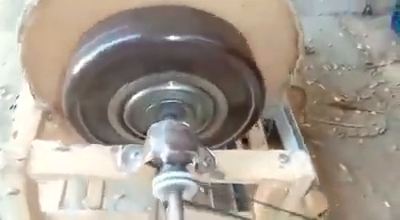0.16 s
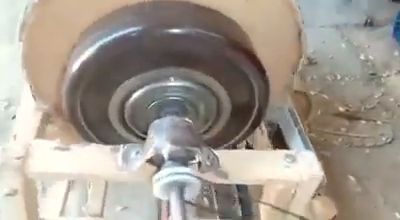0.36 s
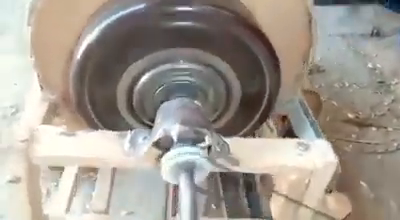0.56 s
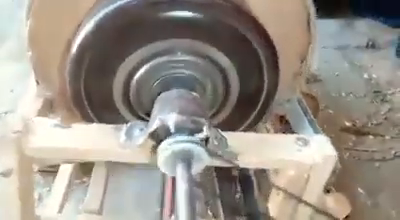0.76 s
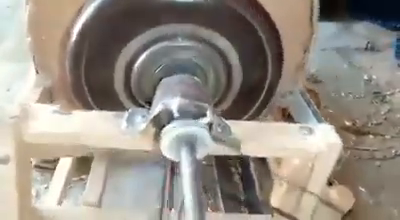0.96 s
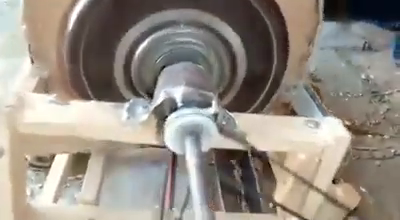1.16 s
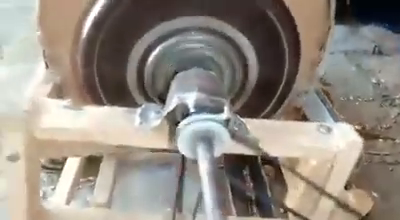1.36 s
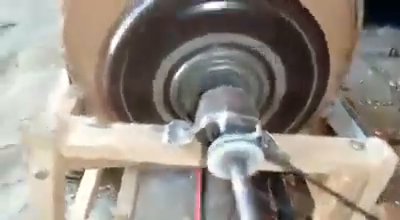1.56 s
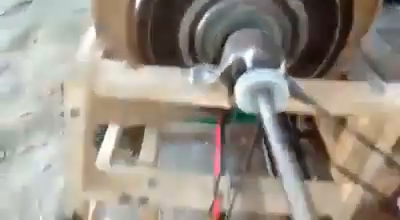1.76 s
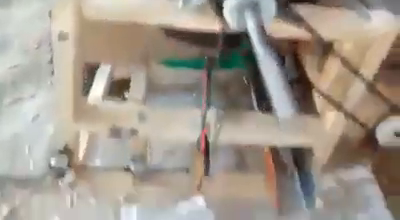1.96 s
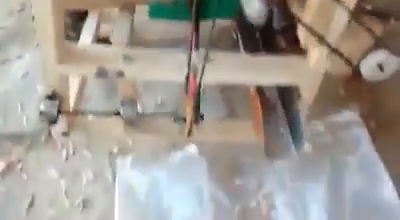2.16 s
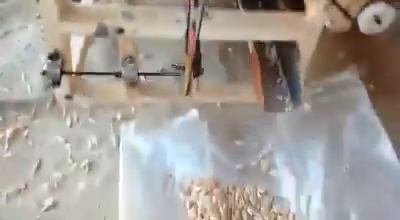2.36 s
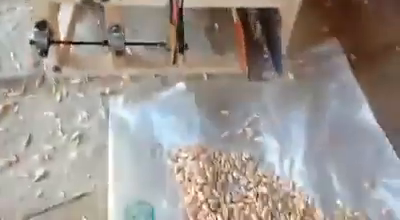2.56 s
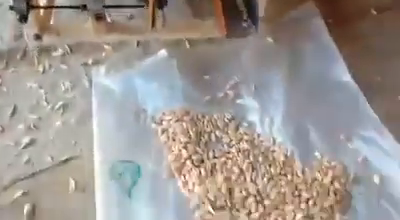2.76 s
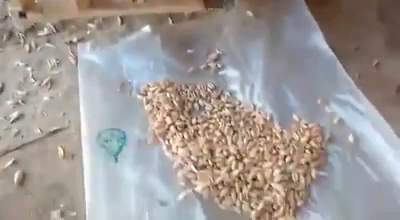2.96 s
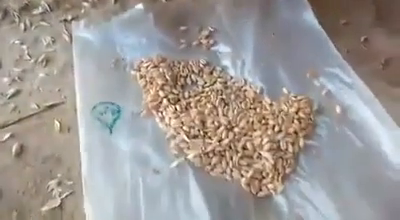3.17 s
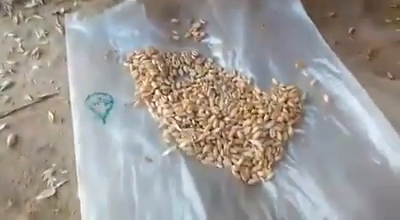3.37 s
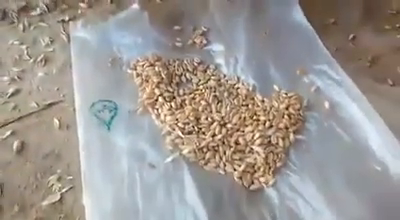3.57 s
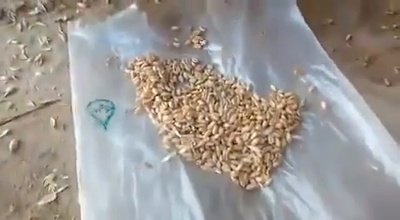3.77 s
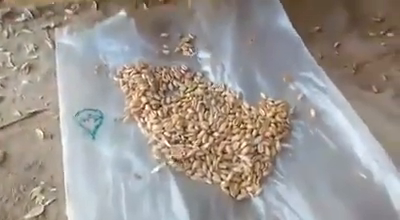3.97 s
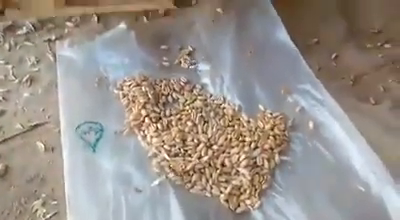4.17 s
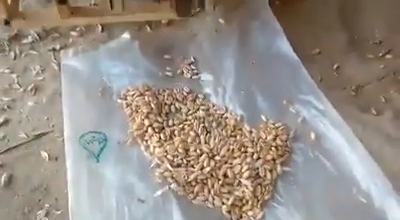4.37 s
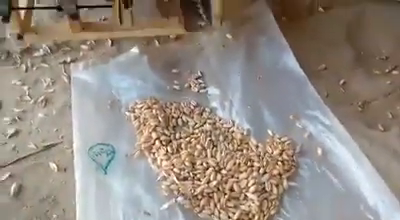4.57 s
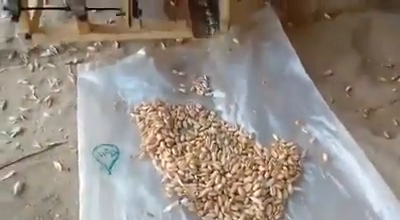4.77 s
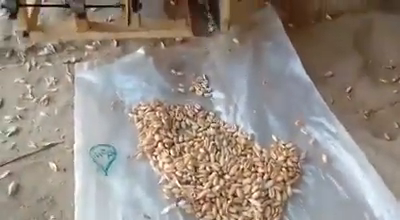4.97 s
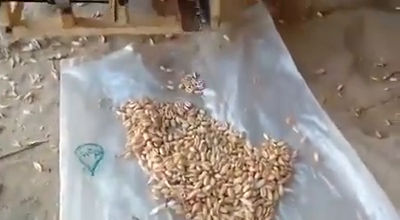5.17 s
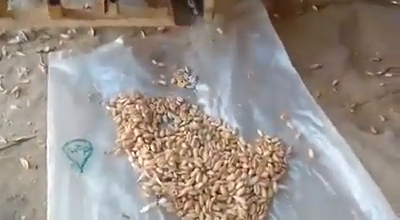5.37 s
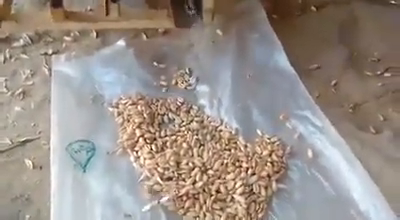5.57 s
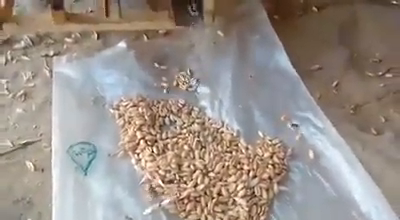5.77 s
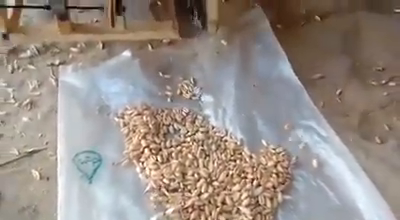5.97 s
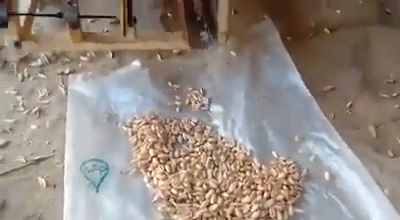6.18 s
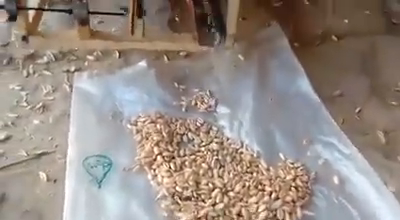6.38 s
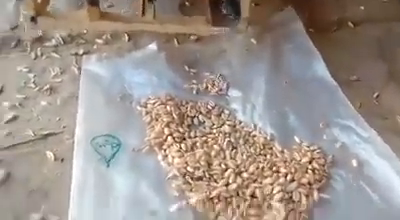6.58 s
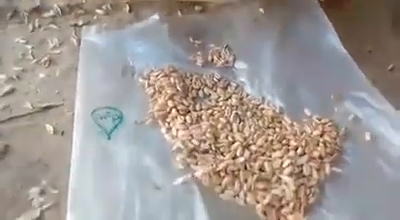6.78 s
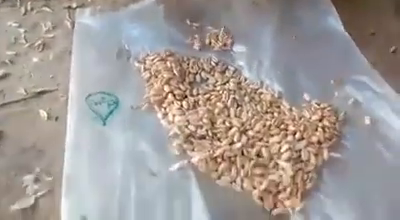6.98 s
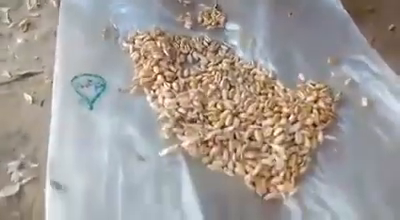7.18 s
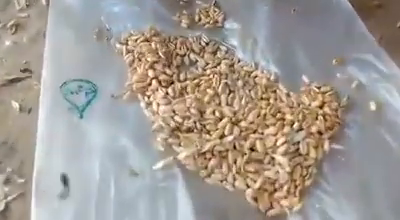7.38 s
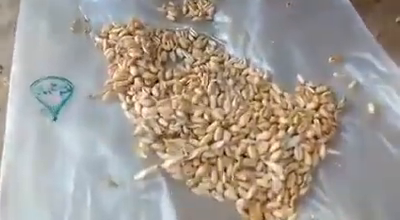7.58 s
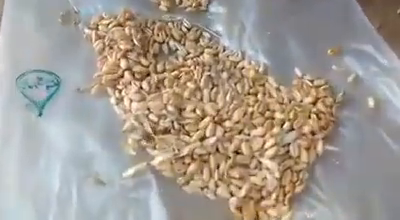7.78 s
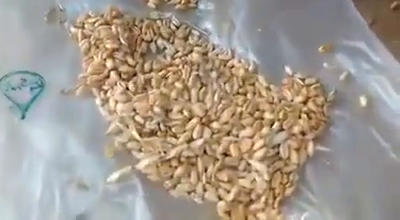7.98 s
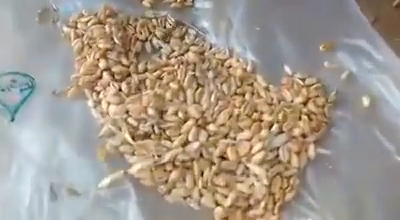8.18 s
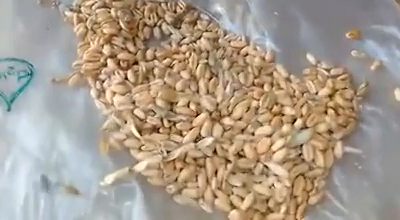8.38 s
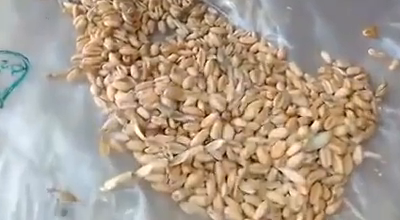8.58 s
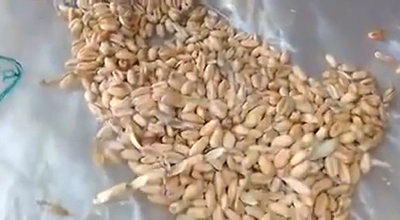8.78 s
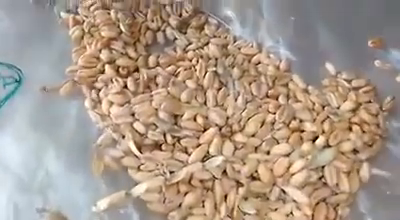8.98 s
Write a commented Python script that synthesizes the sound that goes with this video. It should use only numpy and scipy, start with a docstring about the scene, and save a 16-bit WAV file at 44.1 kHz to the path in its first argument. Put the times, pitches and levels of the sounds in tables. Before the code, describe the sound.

A belt-driven wooden grain huller runs nonstop outdoors, heard close. Dense kernel rattle makes a harsh, bright rush with a fast flutter of about twenty turns a second. A hard crack comes near the second second. As the microphone moves from wheel to grain heap, the rush drops and changes colour, while hollow wooden knocks grow busier towards the end.

```python
"""Outdoors, a homemade belt-driven grain huller runs; the microphone moves from its wheel to the grain below.
Clumps of kernels rattle between the discs as filtered noise, surging with each shaft turn; some crack sharply.
Random jolts and clicks ring the modes of the wooden frame, which drums and knocks in spells.
Chaff hisses and husks tick as bright noise; a faint rumble and a dull whirr lie below.
Other resonances come forward along the path, and echoes carve passing gaps in the rush."""
import sys
import numpy as np
from scipy import signal
from scipy.fft import rfft, irfft, next_fast_len
from scipy.io import wavfile
from scipy.ndimage import uniform_filter1d

SR = 44100
rng = np.random.default_rng(int(sys.argv[2]) if len(sys.argv) > 2 else 0)


def store_pcm(level_fs):
    """Save levels as 16-bit WAV."""
    pcm = np.round(np.clip(level_fs, -1, 1) * 32767).astype(np.int16)
    wavfile.write(sys.argv[1], SR, np.atleast_2d(pcm).T)


N = 398663
TIME = np.arange(N) / SR  # s

# All spectra are relative levels per Hz.
# shaft speed: time_s, speed_turns_per_s
SHAFT = [(0, 18.79), (1, 18.97), (2, 19.45), (3, 19.45), (4, 19.94), (5, 20.14), (6, 20.63), (6.6, 20.72),
         (7.2, 20.04), (8, 20.35), (9, 20.53)]
START_TURNS = -0.09
# microphone path: time_s, place (0 above wheel, 1 outlet, 2 over the grain heap, 3 close to heap)
PLACE = [(0, 0), (2.4, 0.32), (3.2, 1), (5.1, 1), (6.15, 0.85), (6.45, 1.45), (7.6, 2.5), (8.3, 2),
         (9.04, 3)]

# rattle at the microphone: time_s, relative_level_db
FEED = [(0, -23), (1.6, -23.5), (1.85, -23), (2.1, -23.5), (2.7, -25.5), (3.0, -29), (4.0, -28.5),
        (4.35, -26.5), (4.8, -29.5), (5.6, -27), (6.3, -28), (6.6, -26.5), (8.1, -27), (8.3, -26.5),
        (8.65, -25.5), (9.04, -28.5)]
# clumps (+) and lulls (-) of the feed: middle_s, length_s, change_db
CLUMPS = [(.4, 0.21, -1), (.55, 0.052, 2), (.61, 0.096, -2), (1.25, 0.04, -3.5), (1.712, 0.04, -4),
          (2.57, 0.057, -2), (3.184, 0.014, 5.5), (3.29, 0.07, -2.5), (3.398, 0.02, -1),
          (3.81, 0.033, -3.5), (4.045, 0.028, -3), (4.465, .025, -2.5), (4.405, 0.02, 2), (4.95, 0.043, 3),
          (5.73, 0.11, 1.5), (5.85, 0.048, -1.5), (5.96, 0.055, 2.5), (6.07, 0.02, 3.5), (6.14, .04, -3),
          (6.3, 0.1, -2), (6.52, 0.027, 3), (6.69, 0.043, 1.5), (6.81, 0.08, -2.5), (6.89, 0.22, 1),
          (7.17, 0.042, -1.5), (7.5, 0.14, -1.5), (7.625, 0.032, 4), (8.1, 0.14, -2)]
# cracking kernels: start_s, relative_peak_db, relative_treble_db
CRACKS = [(0.2926, -11.5, -34), (0.7002, -9, -34), (0.901, -11.5, -36), (0.951, -11.5, -39),
          (1.034, -12, -36), (1.0685, -9.5, -37), (1.3807, -10, -34), (1.4162, -10, -37),
          (1.5248, -11, -36), (1.732, -2.5, -35), (1.7922, -10, -31), (1.8361, -8.5, -35),
          (1.9299, -9.5, -32), (1.9384, -8, -31), (2.4877, -11.5, -38), (2.609, -11, -37),
          (3.204, -14, -39), (3.3253, -14, -34), (3.4155, -9, -38), (4.0005, -13.5, -40), (4.031, -14, -41),
          (4.0586, -11.5, -34), (4.408, -12, -41), (4.434, -12.5, -39), (4.5565, -13.5, -39),
          (5.287, -13, -40), (5.431, -15, -44), (6.707, -12, -44), (7.0203, -6.5, -27.5),
          (7.1236, -14, -36), (7.7322, -5.5, -39), (8.021, -12, -33), (8.278, -13.5, -42),
          (8.317, -12, -39), (8.365, -11.5, -42), (8.5101, -13, -39), (8.6502, -10.5, -39),
          (8.753, -11.5, -35)]
# scraping husks: freq_hz, level_db
SCRAPE = [(100.0, -70.0), (450.0, -22), (800.0, -21), (950.0, -19), (1300.0, -18), (2200.0, -37),
          (6600.0, -25), (7600.0, -60), (9000.0, -31.5)]
# housing resonances: freq_hz, pole_width_hz, wheel_db, outlet_db, over_heap_db, close_to_heap_db
HOUSING = [(1593, 173, -0.7, -20, -9, -9), (1778, 293, -9, -2.5, -8.5, -3),
           (2110, 213, -9.5, -10.93, -3, -9), (2545, 620, -11, -6.5, -9.5, -1),
           (3232, 815, -4, 1.59, -1.5, -6), (4344.7, 1560, 1.6, 1.5, 1.9, -1.8),
           (5195, 535, 2.3, -2.5, 0.8, -3)]
# highest resonance, the moving bright edge of the rattle: time_s, freq_hz, level_db
EDGE_RING = [(0.0, 5760, 4.1), (0.8, 5690, -1.0), (1.55, 5470, 0.9), (2.05, 5739.06, 1), (2.6, 5480, 6),
             (3.1, 5630, -0.5), (3.5, 5320, -7.5), (4.4, 5375.09, 5.5), (5.1, 5300, 3.5), (6.0, 5430, 2),
             (6.3, 5630, -0.3), (6.6, 5721.29, 9.5), (7.3, 5630, -4.5), (7.75, 5850, 2), (8.4, 5410, 5),
             (8.8, 5700.23, -2), (9.04, 5700, -2)]
EDGE_RING_WIDTH_HZ = 296

# echoes off frame or ground, cancelling (-) or reinforcing (+) a band as the microphone passes:
# start_s, end_s, start_hz, end_hz, width_hz, nominal_change_db
GAPS = [(-0.2, 1.38, 850.0, 860.0, 190.0, -3), (-0.2, 0.3, 1250.0, 1270.0, 320.0, -4.5),
        (-0.2, 0.52, 4780.0, 4790.0, 260.0, -9), (0.12, 1.3, 2240, 2460.0, 180.0, 4.6),
        (0.5, 1.6, 3440, 3420.0, 140.0, 3), (0.54, 1.4, 2650, 3070, 420.0, -9),
        (0.71, 1.32, 1080, 1140.0, 110.0, -12), (1.0, 1.31, 5870, 6000, 182, 8),
        (1.19, 1.63, 1300, 1250.0, 190.0, 12.5), (1.73, 2.18, 5820, 6500, 360.0, 12.5),
        (2.05, 2.44, 1090.0, 1110.0, 340.0, -11), (2.07, 2.77, 1000.0, 1000.0, 130.0, 9),
        (2.15, 2.74, 4450.0, 4800.0, 450.0, -7), (2.19, 2.88, 1410, 1390, 230.0, 11.5),
        (2.53, 3.07, 2120.0, 1820.0, 497, -11.5), (2.75, 3.52, 2670, 2990.0, 270.0, -19),
        (2.81, 4.5, 2270, 2300.0, 420.0, -11), (2.81, 3.54, 4800, 4730.0, 182, -11),
        (2.91, 3.2, 5140, 5100, 191, -13.9), (3.05, 4.22, 1950, 1916, 220.0, -18),
        (3.06, 3.3, 6500, 6600, 220.0, 11), (3.14, 5.8, 1590, 1574, 212, -6),
        (3.26, 3.9, 2630.0, 2670.0, 150.0, 6.8), (3.3, 4.16, 3400, 3620, 430, -6.5),
        (3.61, 4.5, 2940, 2850, 240.0, -18), (3.62, 4.07, 2330.0, 2010.0, 370.0, 9.5),
        (3.7, 3.93, 5800.0, 5970, 121, 16), (4.03, 6.12, 6600, 6700.0, 410, 3),
        (4.05, 4.37, 1430, 1420, 240.0, 15), (4.29, 5.22, 1970, 2010.0, 398, -12.2),
        (4.46, 5.6, 3640, 3490.0, 320.0, -7), (4.5, 5.5, 2710, 2750, 350.0, -16),
        (4.64, 5.4, 5570, 5740, 400.0, -11), (4.66, 5.7, 4880, 4900, 407, -11.5),
        (5.31, 6.18, 1910, 1800, 288, -16), (5.43, 6.81, 2880, 2840.0, 210.0, -16),
        (5.58, 6.03, 1580, 1740.0, 230.0, 11.5), (5.67, 5.5, 5760, 5780, 109, 7),
        (5.71, 7.15, 3480.0, 3460.0, 190.0, -7.6), (6.08, 6.92, 5700, 5500.0, 400.0, -8.5),
        (6.19, 7.62, 1820.0, 1780, 290.0, -14.4), (6.32, 6.65, 1310, 1550, 306, 8.5),
        (6.5, 6.8, 6210.0, 6140, 656, -11), (7.12, 7.61, 2790.0, 2670.0, 212, -11.0),
        (7.65, 9.2, 1820.0, 1730.0, 250.0, -14.5), (7.66, 7.84, 1430, 1410.0, 240.0, 14),
        (7.88, 8.57, 3020, 2960, 270.0, -9.9), (7.91, 8.77, 4300, 4380.0, 280.0, -14),
        (8.22, 9.2, 4200, 4140.0, 120.0, 6), (8.27, 8, 4640, 4600.0, 160.0, -11.6),
        (8.31, 8.93, 3200, 3220.0, 388, -14.5), (8.44, 9.2, 1475, 1430.0, 140.0, -8.4),
        (8.74, 9.2, 3770, 3650, 600.0, -11)]
GAP_FADE_S, RIDGE_SHARE = 0.17, 0.9  # echoes reinforce less fully than they cancel
GAP_WAVER_SHARE, GAP_WAVER_HZ = 0.25, 5  # unsteady hand: rms share of depth, top rate

# chaff hiss: freq_hz, level_db
CHAFF = [(5000, -33), (7000, -9), (7900, -5.5), (8500, -13.5), (10300, -8.5), (11100, -5), (12000, -3),
         (12600, 1), (13300, -0.5), (14100, -8), (15600, -17)]
# ticking light husks: freq_hz, level_db
HUSKS = [(5000, -43), (8500, -14), (11000, -6.5), (12700, 1.5), (13300, 0), (15600, -17)]
# puffs (+) and pauses (-) of the chaff: middle_s, length_s, change_db
PUFFS = [(.04, 0.13, 5), (1.19, .05, 5), (1.6, .07, -5), (2.67, .05, 3.5), (3.19, 0.04, 5),
         (3.35, 0.033, 5), (5.52, 0.14, 3.5), (6.78, 0.1, -3)]
# gap in the early hiss: start_s, end_s, start_hz, end_hz, width_hz, nominal_change_db
CHAFF_GAP = (-.2, 4, 8450, 8500, 500, -5)
CHAFF_REL_DB, CHAFF_FOLLOW_DB_PER_DB, CHAFF_CLUMP_DB_PER_DB = -23.5, 0.73, 0.4
CHAFF_FLUTTER_DB, CHAFF_FLUTTER_HZ = 1.47, 11  # rms depth, top rate

# wooden frame modes: freq_hz, pole_width_hz, wheel_db, outlet_db
FRAME = [(267, 37, -31, -26), (475, 51, -9.5, -3), (567.7, 67, -1, 2), (597.6, 57, 5.5, -6.5),
         (625, 65, 0.5, 0), (690.7, 64, -13.5, -3), (793, 71, -38, -7.5)]
# spells in which the discs bind and shake the frame: start_s, length_s, relative_level_db
SPELLS = [(0.134, 0.066, -44.5), (0.56, 0.18, -42.5), (0.772, 0.2, -39.5), (1.205, 0.28, -40),
          (1.605, 0.57, -40), (2.077, 0.4, -38), (2.406, 0.37, -37.5), (3.458, 0.18, -47.5),
          (3.91, 0.43, -42.5), (4.558, 0.055, -41.5), (5.193, 0.2, -40.5), (5.659, 0.12, -38),
          (5.975, 0.029, -43.5), (6.153, 0.093, -45), (6.346, 0.09, -34.5), (6.548, 0.19, -38),
          (6.844, 0.14, -36), (7.221, 0.17, -34), (7.567, 0.057, -34.5), (7.684, 0.25, -35.5),
          (8.02, 0.27, -34.5), (8.414, 0.27, -34.5), (8.768, 0.33, -33)]
SPELL_ATTACK_S, SPELL_FADE_DB_PER_S, IDLE_REL_DB = 0.018, 40, -50.5
# knocks on the frame: start_s, relative_thump_db, favoured_hz, relative_clack_db
KNOCKS = [(0.751, -27.5, 610, -51), (0.801, -32, 606, -57), (0.829, -24, 586, -53), (1.008, -33, 568, -51),
          (1.069, -24, 636, -51), (1.382, -26.5, 598, -52), (1.439, -24, 595, -49), (1.459, -30, 616, -37),
          (2.052, -26, 579, -54), (2.112, -25, 608, -51), (2.207, -26.5, 614, -56), (2.31, -25, 600, -43),
          (2.408, -22, 573, -51), (2.489, -22, 592, -44), (2.616, -19, 630, -50), (2.658, -25, 598, -39),
          (3.946, -26.5, 637, -31.5), (4.617, -31, 635, -44), (5.219, -22.5, 570, -30),
          (5.356, -33, 570, -41), (5.705, -24.5, 627, -57), (5.77, -24, 580, -50), (6.378, -23, 509, -35),
          (6.399, -24, 619, -29.5), (6.475, -33, 620, -32.5), (6.525, -33, 799, -32.5),
          (6.57, -22.5, 622, -34), (6.664, -19.5, 630, -34.5), (6.774, -31, 630, -38),
          (6.889, -22.5, 627, -48), (6.977, -22, 659, -35), (6.997, -23, 694, -38), (7.334, -26, 610, -47),
          (7.361, -23, 635, -44), (7.606, -20, 605, -43), (7.731, -26, 579, -49), (7.775, -24, 568, -48),
          (7.81, -19, 640, -33.5), (7.849, -26, 568, -42), (7.884, -21.5, 635, -47),
          (8.029, -23.5, 585, -52), (8.102, -19.5, 633, -47), (8.199, -23.5, 560, -41),
          (8.263, -24, 564, -48), (8.315, -21.5, 564, -50), (8.522, -20.5, 641, -36),
          (8.608, -23, 563, -40), (8.661, -25, 557, -33), (8.758, -20.5, 573, -38), (8.823, -23, 659, -43),
          (8.86, -19, 633, -43), (8.948, -19.5, 580, -46)]
THUMP_GAIN_DB, FAVOUR_DB_PER_OCTAVE = 42.5, 18.5
# short clack modes: freq_hz, pole_width_hz, gain_db
CLACK = [(850, 92, 42.5), (1330, 360, 34)]
# loose parts chattering after a knock: freq_hz, level_db
CHATTER = [(150, -26), (430, -7), (600, 1), (820, 6), (1100, -10), (3000, -11), (8000, -38)]

# outdoor rumble: freq_hz, level_db
RUMBLE = [(15, -4), (30, -6), (50, -10), (70, -3), (96, 1.5), (125, 0.5), (160, -5), (250, -5), (500, -37)]
# rumble level before swells, one per place: level_db
RUMBLE_DB = [-75, -81, -77.5, -86]
RUMBLE_SWELL_DB, RUMBLE_SWELL_HZ = 3, 7  # rms depth, top rate
# stronger rumble swells: middle_s, length_s, rise_db
BUFFETS = [(.66, 0.2, 10), (1.31, 0.14, 12), (8.13, 0.26, 11)]
# belt and wheel whirr: freq_hz, level_db
WHIRR = [(120, -40), (170, -18), (200, -8), (240, -1), (280, 2.5), (340, -5), (450, 1.5), (900, -40)]
EDGE_HZ = 15720


def grain():
    """Kernels strike and rub the discs; the housing rings, the chaff hisses and husks tick."""
    feed_db, clumps_db = curves(FEED)[0], swells(CLUMPS)
    hail = impacts(per_s=1300, spread_db=2.5, t60_s=.02)
    rub_share = .31  # smooth rubbing
    work = (rub_share + (1 - rub_share) * hail) * surge(depth_db=0.89, second_db=0.6)
    snaps = sum(crack(s, db - 7.5) for s, db, _ in CRACKS)
    rattle = housing(work * gain_of(feed_db + clumps_db - 0.61) ** 2 + snaps)
    return rattle + chaff(work, feed_db, clumps_db)


def chaff(work, feed_db, clumps_db):
    """Chaff hiss follows the work of the discs; light husks tick at random and cracks add treble."""
    hiss_db = CHAFF_REL_DB + CHAFF_FOLLOW_DB_PER_DB * feed_db + CHAFF_CLUMP_DB_PER_DB * clumps_db
    hiss_db += swells(PUFFS) + CHAFF_FLUTTER_DB * wander(CHAFF_FLUTTER_HZ)
    hiss_power = gain_of(hiss_db) ** 2
    sharp_snaps = sum(crack(s, treble_db + 4.0) for s, _, treble_db in CRACKS)
    ticks = impacts(per_s=250, spread_db=2.6, t60_s=.06)
    sound = coloured(noise(0.85 * work ** 0.96 * hiss_power + sharp_snaps), CHAFF)
    sound += coloured(noise(0.35 * ticks * hiss_power), HUSKS)
    sound = reflected(hollowed(sound, [CHAFF_GAP]), echo_db=-22, drift_s=.00008)
    return sound / np.std(coloured(noise(1), CHAFF))


def housing(power):
    """Blows ring the housing; its colour changes with the position of the microphone."""
    sound = coloured(noise(power), SCRAPE)
    for hz, width_hz, *place_db in HOUSING:
        luck = .6 + .4 * impacts(per_s=400, spread_db=2.4, t60_s=.03)  # blows favour different modes
        sound += gain_of(at_place(place_db)) * resonate(noise(power * luck), hz, width_hz)
    edge_hz, edge_db = curves(EDGE_RING)
    sound += gain_of(edge_db) * glide(noise(power), edge_hz, EDGE_RING_WIDTH_HZ)
    sound = without_bass(hollowed(sound, GAPS), hz=610)
    sound = reflected(sound, echo_db=-21, drift_s=.0003)
    # colour changes, smoothed power stays that of the blows
    blow_power = uniform_filter1d(power, size=15000)
    sound_power = uniform_filter1d(sound ** 2, size=15000)
    return sound * np.sqrt(blow_power / sound_power)


def crack(s, db):
    """Power of a kernel's snap and its weaker, longer tail."""
    return burst(s, db + 2.5, t60_s=.009) + burst(s, db - 11, t60_s=.05)


def surge(depth_db, second_db):
    """The disc runs slightly out of true and presses the grain harder once a turn."""
    angle = 2 * np.pi * (START_TURNS + np.cumsum(curves(SHAFT)[0]) / SR)
    power = gain_of(depth_db * np.cos(angle) + second_db * np.cos(2 * angle)) ** 2
    return power / power.mean()


def frame():
    """Uneven jolts drum the frame modes; knocks favour some modes and add a dry clack and chatter."""
    outlet_share = np.clip(curves(PLACE)[0], 0, 1)
    jolts = impacts(per_s=300, spread_db=2.5, t60_s=0.016) * surge(depth_db=2.0, second_db=-0.8)
    shake = (0.55 + 0.99 * jolts) * gain_of(load() - 2.0) ** 2
    _, thump_db, favoured_hz, clack_db = np.transpose(KNOCKS)
    drumming = ringing = passed = 0
    for k, (hz, width_hz, wheel_db, outlet_db) in enumerate(FRAME):
        gain = gain_of(wheel_db + outlet_share * (outlet_db - wheel_db))
        off_pitch_octaves = abs(np.log2(hz / favoured_hz))
        blows = strikes(thump_db + THUMP_GAIN_DB - FAVOUR_DB_PER_OCTAVE * off_pitch_octaves)
        drumming += gain * resonate(noise(shake), hz, width_hz)
        ringing += (-1) ** k * gain * resonate(blows, hz, width_hz)
        passed += gain ** 2 * np.pi * width_hz / (2 * SR)  # power share let through by the mode
    clack = sum(resonate(strikes(clack_db + db), hz, width_hz) for hz, width_hz, db in CLACK)
    chatter_power = sum(burst(s, db + 11.5, t60_s=0.15) for s, _, _, db in KNOCKS)
    chatter = coloured(noise(chatter_power), CHATTER)
    return without_bass(drumming / np.sqrt(passed) + ringing + clack + chatter, hz=163)


def load():
    """Relative drumming level in dB: each spell rises, holds and fades to the idle tremor."""
    level = gain_of(IDLE_REL_DB)
    for s, length_s, db in SPELLS:
        rise = np.clip((TIME - s) / SPELL_ATTACK_S, 0, 1)
        fade_db = SPELL_FADE_DB_PER_S * np.maximum(TIME - s - length_s, 0)
        level = np.maximum(level, rise * gain_of(db - fade_db))
    return 20 * np.log10(level)


def strikes(levels_db):
    """One click per knock, at the given levels."""
    return np.bincount([round(row[0] * SR) for row in KNOCKS], gain_of(levels_db), N)


def rumble():
    """Low noise that swells at random, plus the steady dull whirr of belt and wheel."""
    level_db = at_place(RUMBLE_DB) + RUMBLE_SWELL_DB * wander(RUMBLE_SWELL_HZ) + swells(BUFFETS)
    low = gain_of(level_db) * evened(coloured(noise(1), RUMBLE))
    whirr = gain_of(-60.5) * evened(coloured(noise(1), WHIRR))
    return low + whirr


def impacts(per_s, spread_db, t60_s):
    """Power of a random hail of blows, few large among many small, with a local mean near one."""
    count = round(per_s * N / SR)
    size = gain_of(spread_db * np.minimum(rng.exponential(1, count), 4.1)) ** 2
    power = linger(np.bincount(rng.integers(0, N, count), size, N), t60_s) + 1e-9
    return power / uniform_filter1d(power, size=5000)


def linger(power, t60_s):
    """Spreads each burst of power into a dying tail of the same energy."""
    r = np.exp(-np.log(10 ** 6) / (t60_s * SR))
    return signal.lfilter([1 - r], [1, -r], power)


def burst(s, db, t60_s):
    """Power of one blow that dies away."""
    power = np.zeros(N)
    span = slice(round(s * SR), round((s + 2 * t60_s) * SR))
    power[span] = gain_of(db - 60 * (TIME[span] - s) / t60_s) ** 2
    return power


def noise(power):
    """Fresh noise that follows a power envelope."""
    return np.sqrt(np.maximum(power, 0)) * rng.standard_normal(N)


def resonate(x, hz, width_hz):
    """Steep resonance of about unit gain, from doubled poles."""
    r = np.exp(-np.pi * width_hz / SR)
    poles = np.poly([r * np.exp(2j * np.pi * hz / SR)] * 2)
    denominator = np.convolve(poles, poles.conj()).real
    return signal.lfilter(2 * (1 - r) ** 2 * poles.real, denominator, x + 1e-18)


def glide(x, hz, width_hz):
    """Steep resonance of about unit gain that follows the curve hz: shift down, low-pass, shift back."""
    turn = np.exp(2j * np.pi * np.cumsum(hz) / SR)
    r = np.exp(-np.pi * width_hz / SR)
    lowpassed = signal.lfilter([(1 - r) ** 2], np.poly([r, r]), x * turn.conj())
    return 2 * (turn * lowpassed).real


def hollowed(x, gaps):
    """Fades each gliding gap (or ridge, for positive dB) into the sound and out again."""
    hz, t, z = signal.stft(x, SR, nperseg=1024, noverlap=768)
    change_db = np.zeros(z.shape)
    for start, end, start_hz, end_hz, width_hz, db in gaps:
        opening = np.clip(np.minimum(t - start, end - t) / GAP_FADE_S + .5, 0, 1)
        opening *= 1 + GAP_WAVER_SHARE * np.interp(t, TIME, wander(GAP_WAVER_HZ, count=5))
        opening *= RIDGE_SHARE if db > 0 else 1
        on = opening > 0
        centre_hz = np.interp(t[on], [start, end], [start_hz, end_hz])
        shape = np.exp(-(2 * (hz[:, None] - centre_hz) / width_hz) ** 2)
        change_db[:, on] += db * opening[on] * shape
    return signal.istft(z * gain_of(change_db), SR, nperseg=1024, noverlap=768)[1][:N]


def reflected(x, echo_db, drift_s, count=8):
    """Faint echoes off nearby boards ripple the tone; their paths change as the microphone wanders."""
    out, t = x.copy(), TIME[::512]
    # lag_s, pace_hz, start_turns
    for lag, pace, start in rng.uniform([.003, .08, 0], [.012, .3, 1], (count, 3)):
        delay_s = np.interp(TIME, t, lag + drift_s * np.sin(2 * np.pi * (pace * t + start)))
        out += gain_of(echo_db) * np.interp(TIME - delay_s, TIME, x, left=0)
    return out / np.sqrt(1 + count * gain_of(echo_db) ** 2)


def without_bass(x, hz):
    """High-pass: small parts radiate little below hz."""
    return signal.sosfilt(signal.butter(4, hz, "high", fs=SR, output="sos"), x)


def coloured(x, points):
    """Filters by a spectrum of (Hz, dB) points."""
    hz, db = np.transpose(points)
    size = next_fast_len(N + 4096)
    f = np.fft.rfftfreq(size, 1 / SR)
    gain = gain_of(np.interp(np.log(f + 1), np.log(hz), db))
    return irfft(rfft(x, size) * gain, size)[:N]


def wander(top_hz, count=14):
    """Slow random curve with an rms of one: sines from 1 Hz to top_hz."""
    t = TIME[::64]
    rates_hz = np.geomspace(1, top_hz, count)
    curve = sum(np.sin(2 * np.pi * (hz * t + rng.random())) for hz in rates_hz)
    return np.interp(TIME, t, evened(curve))


def swells(table):
    """Sum of smooth bumps in dB from rows of (middle_s, length_s, change_db)."""
    t = TIME[::64]
    bumps_db = sum(db * np.exp(-(2 * (t - s) / length_s) ** 2) for s, length_s, db in table)
    return np.interp(TIME, t, bumps_db)


def at_place(values):
    """Blends values given at the four places along the microphone's path."""
    t = TIME[::64]
    place = np.interp(t, *np.transpose(PLACE))
    return np.interp(TIME, t, np.interp(place, np.arange(len(values)), values))


def curves(table):
    """Each column of a table of (time_s, ..) rows, sample by sample."""
    s, *columns = np.transpose(table)
    return [np.interp(TIME, s, c) for c in columns]


def evened(x):
    """Scales to an rms of one."""
    return x / np.sqrt(np.mean(x ** 2) + 1e-20)


def gain_of(db):
    """Decibels to amplitude."""
    return np.exp(np.asarray(db) * (np.log(10) / 20))


def scene():
    """The machine close by in open air."""
    return (grain() + frame() + rumble())[None]


def record(dry):
    """Steady low-pass at EDGE_HZ."""
    lowpass = signal.firwin(801, EDGE_HZ, window=("kaiser", 9), fs=SR)
    return signal.oaconvolve(dry, lowpass[None], "same")


dry = scene()
out = record(dry)
store_pcm(out)
```